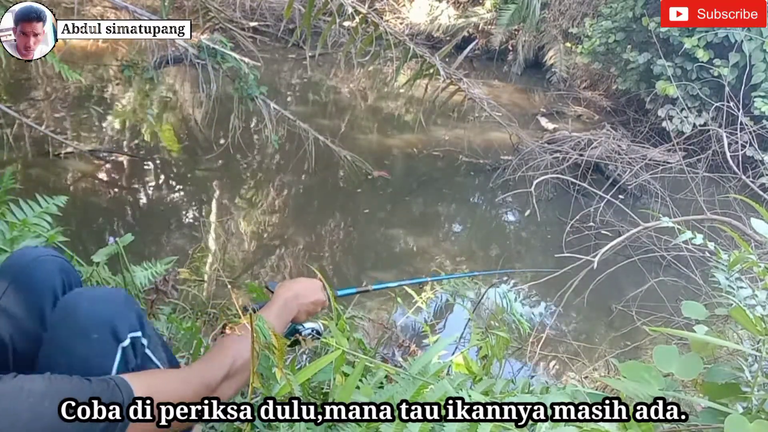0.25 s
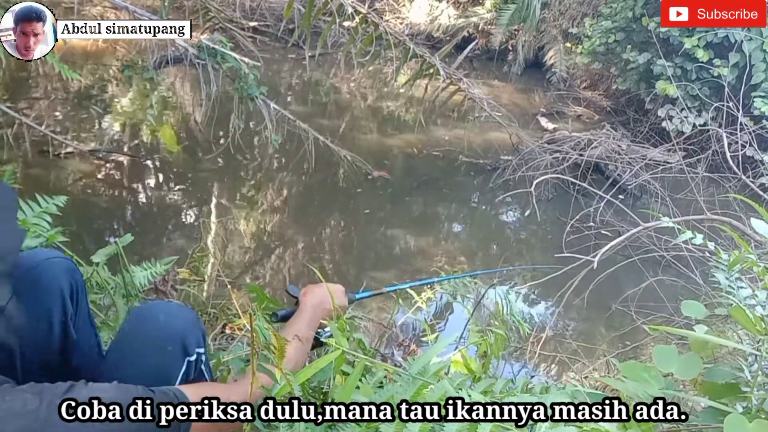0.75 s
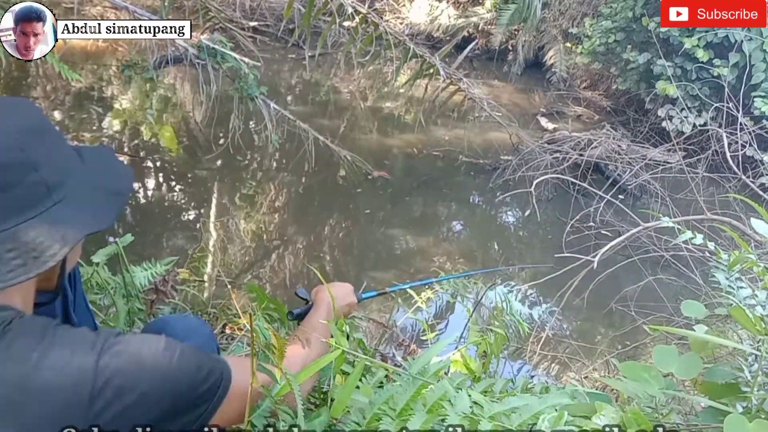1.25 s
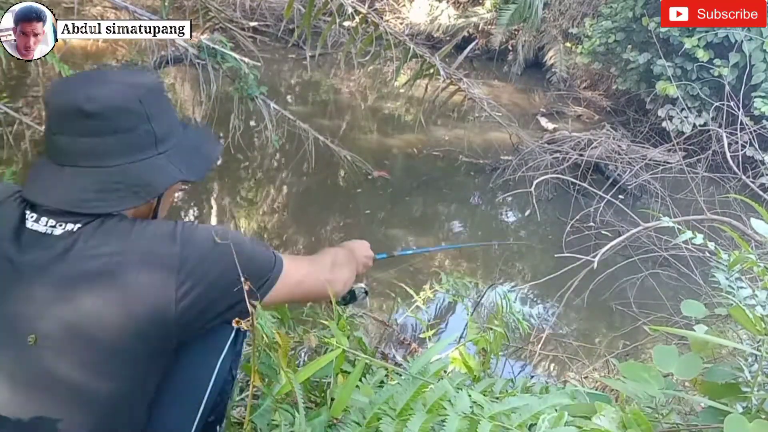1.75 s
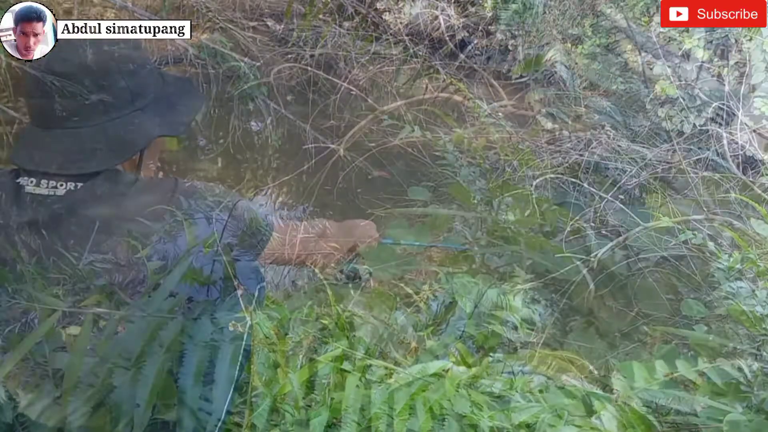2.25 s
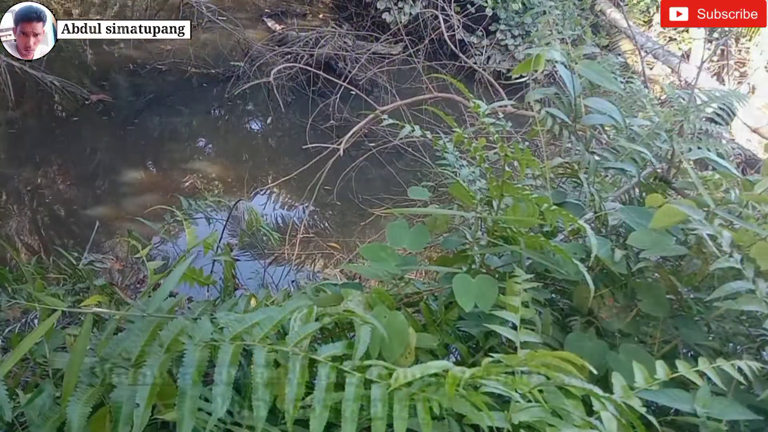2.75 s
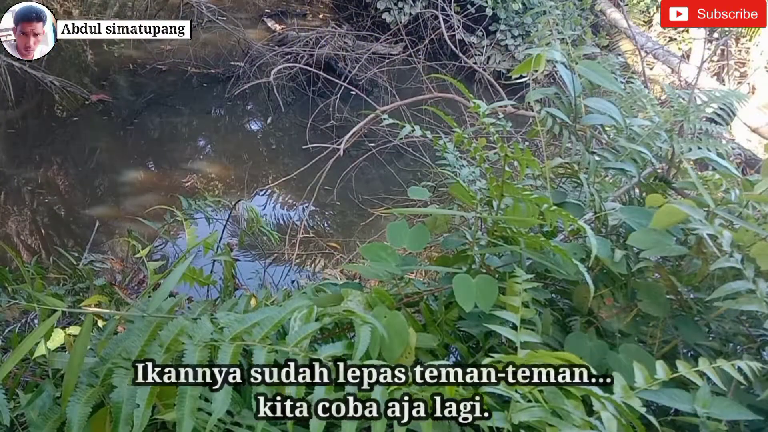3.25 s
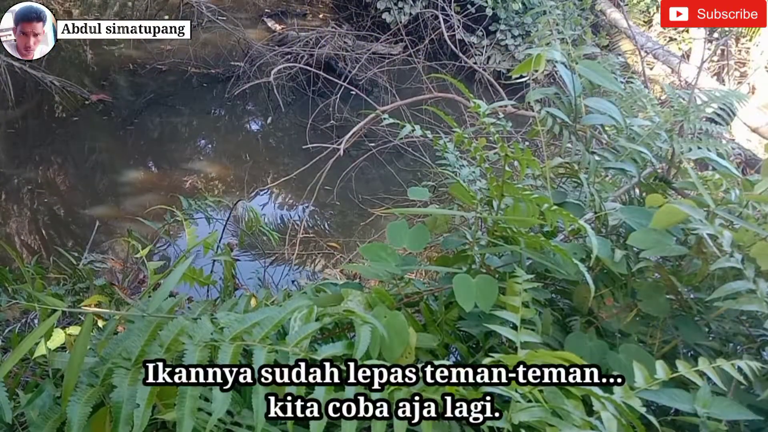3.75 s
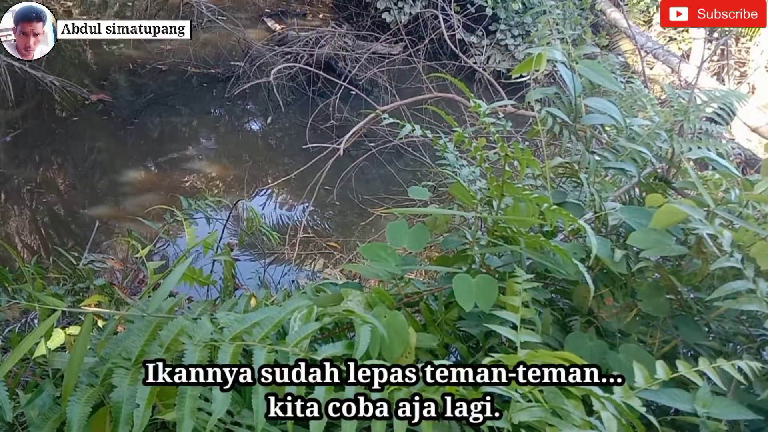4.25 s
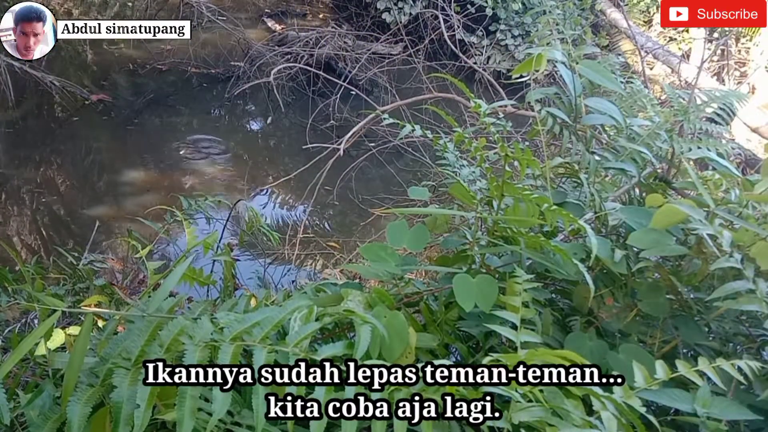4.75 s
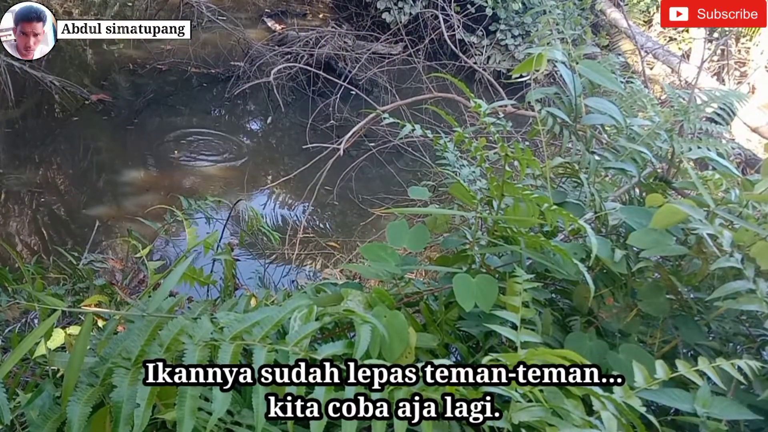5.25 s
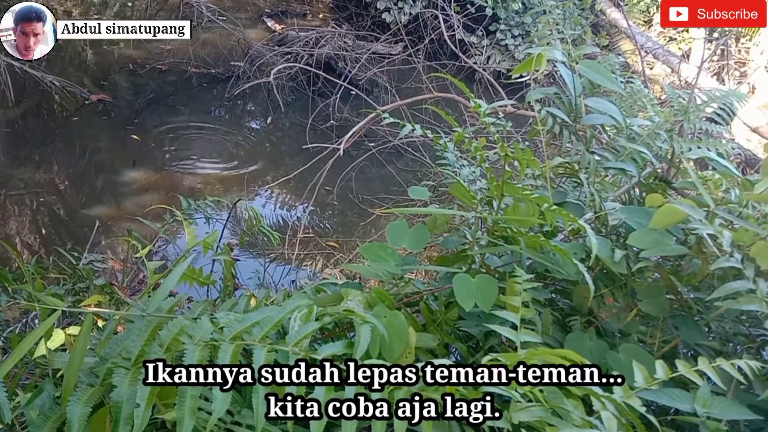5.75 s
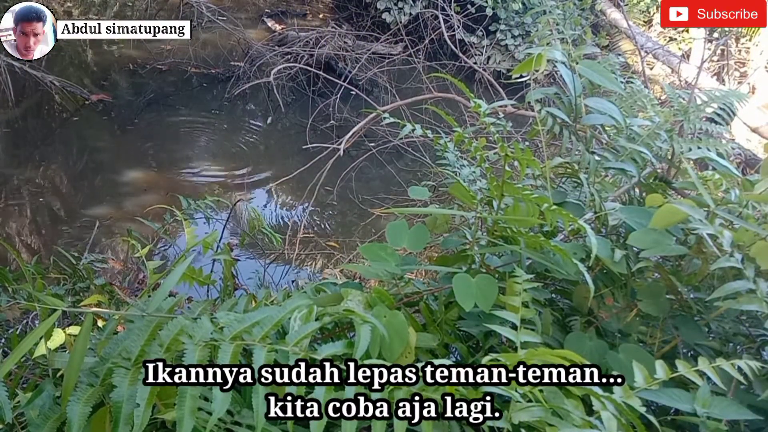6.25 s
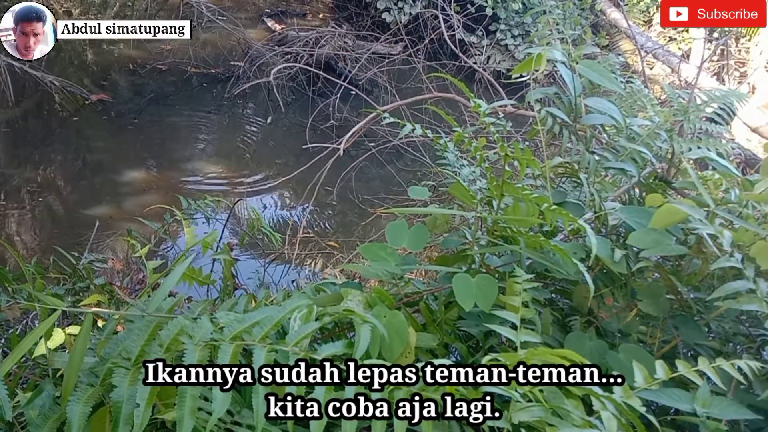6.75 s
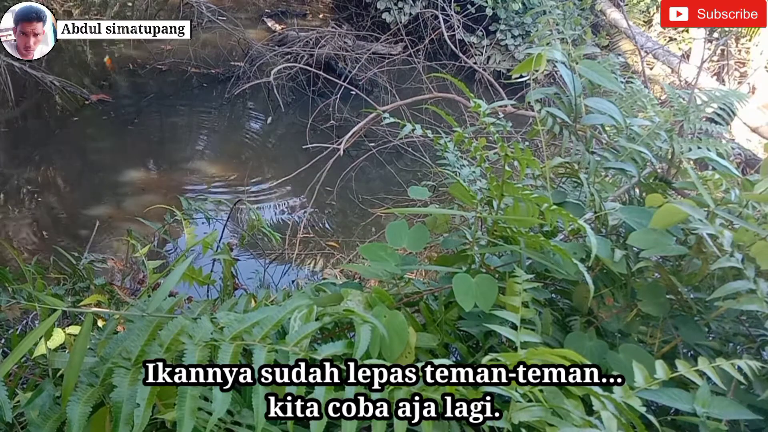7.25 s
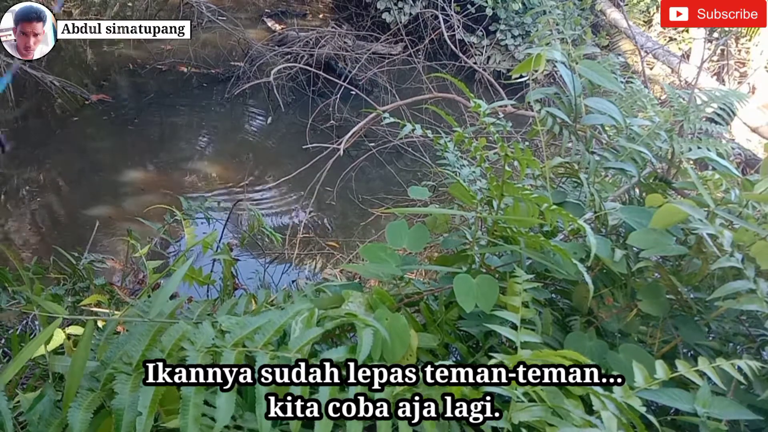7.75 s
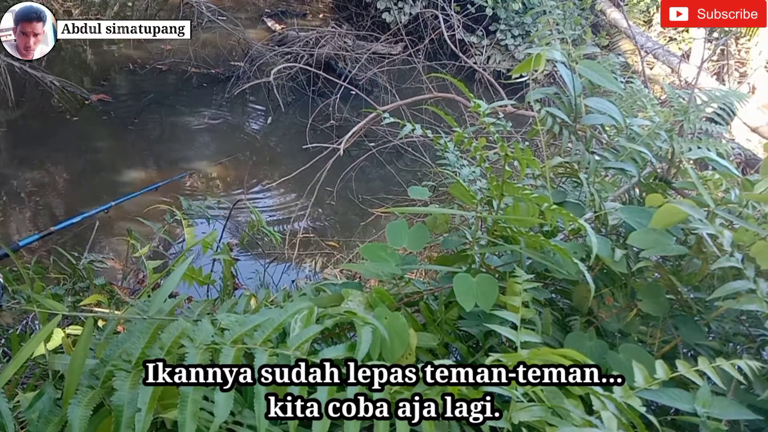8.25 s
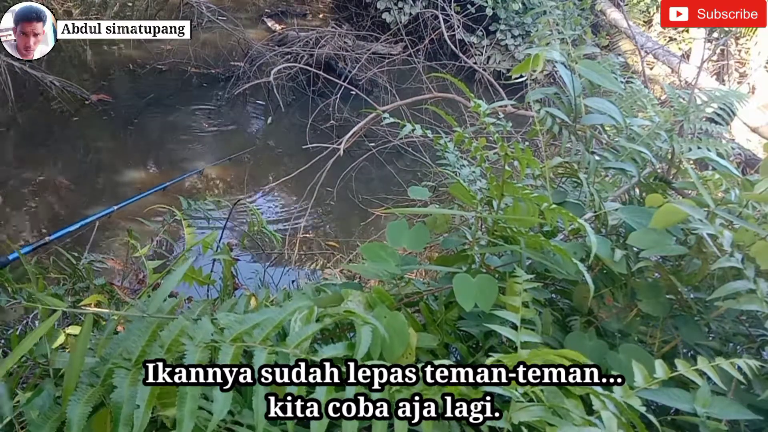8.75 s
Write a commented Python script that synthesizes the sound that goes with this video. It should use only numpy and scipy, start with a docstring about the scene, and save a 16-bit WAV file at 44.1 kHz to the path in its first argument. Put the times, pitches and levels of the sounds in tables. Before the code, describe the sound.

Heard from a leafy creek bank, a high, sizzling bed of crickets runs throughout, with faint bird chirps farther off. Small nearby clicks and rustles of stems and tackle come first, then a close cricket chirps and a small plop sounds in the water. A single loud wooden crack with a short echo dominates, followed by a quick cluster of clicks and a faint swelling whine.

```python
"""Crickets on a wooded creek bank

A bed of bush crickets drones near 8 kHz, wing on wing, with single insects throbbing, buzzing and
chirping in it. Far birds call over a wash of air and slow water. Up close, leaves rustle and stems and
fishing tackle click. A plop sets bubbles ringing, a soft bump follows, and at 6 s one loud wooden crack
rings out among the trees. A thin whine swells towards the end."""
import sys
import numpy as np
from scipy import signal
from scipy.fft import rfft, irfft
from scipy.io import wavfile

SR = 44100
rng = np.random.default_rng(int(sys.argv[2]) if len(sys.argv) > 2 else 0)


def inscribe(sig):
    """Save sig as 16-bit PCM at rate SR to the path in sys.argv[1].

    A 1-D sig is mono; a 2-D sig holds one channel per row.
    Samples are clipped to [-1, 1] before scaling.
    """
    pcm = np.round(np.clip(np.atleast_2d(sig).T, -1, 1) * 32767)
    wavfile.write(sys.argv[1], SR, pcm.astype(np.int16))


N = 396900
TIME = np.arange(N) / SR

# Table levels are relative: each layer's function sets its own trim.
# fader moves of the cricket bed: t/s, drone level/dB, sizzle level/dB
CHORUS_LEVELS = [(0.0, -54, -66), (0.68, -55, -66.5), (1.8, -54.5, -64.5), (2.46, -60, -69),
                 (2.98, -58.5, -64.5), (3.46, -55.5, -61), (4.21, -56.5, -60.5), (5.79, -55, -60.5),
                 (8.5, -55.5, -60), (9.0, -53.5, -62)]
# spectra of the wing drone and the sizzle above it: f/Hz, level/dB
DRONE_COLOUR = [(6700, -42.5), (7150, -33), (7480, -10.5), (7700, -11), (7980, -2), (8300, 1), (8520, -3),
                (8730, -15.5), (9100, -18.5), (9400, -24.5), (9850, -32.5), (11400, -34)]
SIZZLE_COLOUR = [(10200, -38.5), (10800, -24.5), (11450, -26), (12000, -13), (13100, -7.5), (13600, -6.5),
                 (14100, -3), (15400, 2), (16500, 0.5)]
# spectrum of air and slow water: f/Hz, level/dB
AIR_COLOUR = [(20, -15.5), (45, -4), (90, 3.5), (160, 0.5), (330, -4), (600, -6.5), (1080, -6),
              (1330, -1.5), (1800, -8.5), (3200, -16.5), (4700, -26.5), (5300, -43), (7000, -16),
              (12000, -25.5)]
# swell of that wash: t/s, level/dB
AIR_LEVELS = [(0.0, -78), (1.28, -78), (1.51, -72.5), (1.66, -75), (2.15, -80), (5.9, -77)]
# far twitter in the canopy: t/s, high voices' level/dB, low voices' level/dB
TWITTER_LEVELS = [(0.0, -92.5, -82), (1.75, -86.5, -89), (2.35, -91.5, -82), (3.72, -85.5, -83),
                  (5.0, -89.5, -81), (6.6, -90, -86.5), (8.35, -92, -86), (8.7, -87, -82.5)]
# far cricket trills: start/s, end/s, f/Hz, width/Hz, level/dB
TRILLS = [(0, 2.8, 5860, 70, -81), (0, 2.4, 6850, 240, -83), (0, 6.2, 6520, 150, -88),
          (6.3, 9, 9590, 120, -80)]
# low bird notes and, at 7.869 s, the brief low ring of the loud click: t/s, length/s, f/Hz, level/dB
LOW_NOTES = [(.01, 0.075, 700, -78.5), (1.243, 0.17, 354, -72), (1.493, .23, 348.6, -71),
             (1.942, 0.062, 350, -71), (2.522, 0.079, 705, -81), (2.63, 0.074, 705, -74.5),
             (7.355, .1, 697, -79.5), (7.869, 0.055, 726, -70), (8.075, 0.069, 699, -70),
             (8.164, 0.1, 699, -71)]
# upward slurs: t/s, length/s, starting f/Hz, level/dB
SLURS = [(.122, .12, 1700, -67.5), (.443, .115, 1700, -68.5), (1.745, 0.054, 2440, -63)]
# falling whistles: t/s, length/s, level/dB, roughness
WHISTLES = [(0.125, .1, -67, 1.08), (6.291, 0.096, -66.5, 0.95), (8.282, 0.32, -65.5, 0.13)]
# short, nearly level bird notes: t/s, length/s, f/Hz, level/dB
SHORT_NOTES = [(3.46, .06, 5500, -82), (3.564, .045, 4190, -73), (3.661, 0.2, 1298, -78),
               (3.72, .065, 4430, -72), (3.795, .07, 4000, -77), (3.869, .065, 4150, -70.5),
               (4.007, .06, 4000, -69.5), (5.179, 0.052, 1460, -70), (5.305, 0.073, 1470, -72),
               (5.415, .055, 1507, -73.5), (6.414, 0.083, 1366, -61)]
# leaf rustles: t/s, length/s, level/dB, centre f/Hz
RUSTLES = [(.262, 0.035, -67, 1140), (.263, 0.033, -65.5, 340), (1.369, 0.25, -59.5, 3700),
           (1.404, 0.12, -68.5, 1220), (1.752, .052, -61, 12900), (2.42, 0.052, -71, 4000),
           (2.539, 0.065, -58, 4600), (2.552, .06, -69.5, 1410), (2.858, .21, -73.5, 3200),
           (7.841, .15, -72, 3750), (7.864, 0.069, -64.5, 1400)]
# clicks of stems and tackle: t/s, level/dB, body f/Hz, snap against body/dB
CLICKS = [(.27, -55, 1190, 12.5), (.829, -60.5, 1600, 21), (.883, -40, 5650, -21), (.881, -56, 1370, -6),
          (.941, -46.5, 4640, -10), (1.42, -43.5, 1380, 5.5), (1.4689, -43, 1220, 15.5),
          (1.54, -42, 4100, 11), (2.428, -65.5, 2760, 18.5), (2.561, -49, 4300, 0), (3.356, -53, 2340, 7.5),
          (4.08, -52.5, 5770, 9.5), (4.583, -60.5, 2540, 9), (5.695, -41.5, 6500, -15),
          (7.8512, -30.5, 3780, 7), (7.877, -40, 1640, -17), (7.8857, -29, 4600, -4),
          (8.739, -46.5, 1500, -10)]
# spectrum of a click's snap: f/Hz, level/dB
SNAP_COLOUR = [(200, -4), (900, 1), (3000, 1.5), (5000, -1.5), (8000, 3), (10500, -4.5), (15000, -11)]
# bouts of the nearest cricket: t/s, number of chirps, level/dB
CHIRP_BOUTS = [(3.203, 4, -45), (3.704, 3, -43)]
# bubbles of the plop: t/s, starting f/Hz, level/dB
BUBBLES = [(4.196, 2200, -39.5), (4.215, 924, -42), (4.216, 1415, -46), (4.214, 2250, -43),
           (4.238, 4380, -40)]
# the whine, one curve per phrase: t/s, f/Hz, level/dB
WHINE_PHRASES = [
    [(5.15, 2850, -93), (5.3, 2847, -72), (5.798, 2853, -92), (5.92, 2847, -72.5), (6.0, 2890, -75)],
    [(7.3, 2964, -87), (7.574, 2965, -73.5), (7.868, 2946, -69.5), (7.914, 2946, -83.5), (8.118, 2937, -66),
     (8.18, 2910, -91), (8.208, 2910, -68), (8.266, 2916, -97), (8.402, 2892, -66), (8.454, 2860, -96.5),
     (8.52, 2945, -64.5), (9.0, 2890, -59)],
]
# the crack's two breaks in quick succession: t/s, level/dB
CRACK_BREAKS = [(6.0092, -9), (6.0109, -8.5)]
# spectra of the crack and of its scatter from the trees: f/Hz, level/dB
CRACK_COLOUR = [(25, -31.5), (130, -1), (290, -13.5), (450, 1), (750, -3.5), (1050, 0.5), (1350, 3),
                (1700, -11), (2700, -12), (4300, -27.5), (5500, -51), (12000, -58.5)]
SCATTER_COLOUR = [(25, -34), (100, -5), (260, -11), (450, -2.5), (750, -5.5), (1150, 3.5), (1400, -5.5),
                  (1800, -8), (3000, -2.5), (4300, -10.5), (5600, -26.5), (8000, -16.5), (10500, -40.5),
                  (15000, -35)]
# reverb time among the trees: f/Hz, t60/s
WOOD_T60 = [(60, 0.89), (500, 0.23), (1200, 0.69), (3000, 0.45), (6000, 0.88), (15000, .4)]


def from_db(db):
    """Decibels to gain."""
    return 10 ** (np.asarray(db) / 20)


def rms_one(x):
    """Scale to rms 1."""
    return x / np.sqrt(np.mean(x ** 2) + 1e-20)


def in_time(rows):
    """Each column of a curve at every sample."""
    s, *columns = np.transpose(rows)
    return [np.interp(TIME, s, c) for c in columns]


def at_hz(points, hz):
    """Read a curve on a log-frequency axis."""
    f, value = np.transpose(points)
    return np.interp(np.log(hz + 1e-9), np.log(f), value)


def add(out, s, sound):
    """Mix a sound in at time s."""
    i = max(round(s * SR), 0)
    out[i:i + len(sound)] += sound[:max(N - i, 0)]


def sine(hz):
    """An oscillator that follows a pitch curve."""
    return np.sin(2 * np.pi * np.cumsum(hz) / SR)


def noise(colour):
    """Noise with the given spectrum, rms 1."""
    gain = from_db(at_hz(colour, np.fft.rfftfreq(N, 1 / SR)))
    return rms_one(irfft(rfft(rng.standard_normal(N)) * gain, N))


def narrow(hz, width_hz):
    """Noise in one steep resonance, rms 1."""
    detune = (np.fft.rfftfreq(N, 1 / SR) - hz) / (width_hz / 2)
    return rms_one(irfft(rfft(rng.standard_normal(N)) / (1 + detune ** 2), N))


def drift(width_hz):
    """Random modulation, rms 1; wider moves faster."""
    return narrow(0, width_hz)


def gate(length, edge):
    """A note's envelope; edge is the share spent rising and falling."""
    return signal.windows.tukey(max(int(length * SR), 8), edge)


def pulse(colour, size=4096):
    """The tightest causal transient with the given spectrum, peak 1."""
    cepstrum = irfft(np.log(from_db(at_hz(colour, np.fft.rfftfreq(size, 1 / SR)))))
    shape = irfft(np.exp(rfft(2 * cepstrum[:size // 2], size)))
    return shape / np.abs(shape).max()


def among_trees(x, t60):
    """Diffuse reverb from trunks and leaves, at unity energy gain."""
    tail = rng.standard_normal(SR) * from_db(-60 * TIME[:SR] / t60)
    return signal.fftconvolve(x, tail / np.linalg.norm(tail))[:N]


def chorus(stroke_hz=19):
    """Many wings blur into a drone and a sizzle; the nearer ones leave a trace of their stroke rate."""
    drone_db, sizzle_db = in_time(CHORUS_LEVELS)
    strokes = sine(stroke_hz * (1 + .14 * drift(5.2)))
    drone = noise(DRONE_COLOUR) * from_db(drone_db + 1.5 + .5 * drift(130) - .1 * strokes)
    sizzle = noise(SIZZLE_COLOUR) * from_db(sizzle_db + 7 + 1.5 * drift(90))
    return drone + sizzle


def air():
    """The soft wash of air, leaves and slow water."""
    db, = in_time(AIR_LEVELS)
    return noise(AIR_COLOUR) * from_db(db - .1 * drift(60))


def twitter():
    """Many far birds blur into two flickering registers."""
    high_db, low_db = in_time(TWITTER_LEVELS)
    high = narrow(hz=4600, width_hz=700) * from_db(high_db + 4 * drift(30))
    low = narrow(hz=2900, width_hz=2000) * from_db(low_db + 2.5 * drift(30))
    return high + low


def trilling_crickets():
    """Far crickets hold faint trills, each in its own narrow band."""
    out = np.zeros(N)
    for start, end, hz, width_hz, db in TRILLS:
        shape = gate(end - start, edge=.13)[:N]
        add(out, start, from_db(db) * shape * narrow(hz, width_hz)[:len(shape)])
    return out


def note_cues(slur_octaves_per_s=4.4, whistle_hz=(1100, 988), faint_count=7, faint_s=.16):
    """The cue list of notes: t/s, length/s, starting f/Hz, ending f/Hz, level/dB, roughness."""
    low = [(s, length, hz, hz, db, .59) for s, length, hz, db in LOW_NOTES]
    slurs = [(s, length, hz, hz * 2 ** (slur_octaves_per_s * length), db, .8)
             for s, length, hz, db in SLURS]
    whistles = [(s, length, *whistle_hz, db, rough) for s, length, db, rough in WHISTLES]
    short = [(s, length, hz, hz * .985, db, .34) for s, length, hz, db in SHORT_NOTES]
    # faint high notes from the canopy, one at random in each time slot
    slot_s = (N / SR - 2 * faint_s) / faint_count
    times = (np.arange(faint_count) + rng.random(faint_count)) * slot_s
    pitches = rng.normal(4700, 120, faint_count)
    faint = [(s, faint_s, hz, hz, -85, .3) for s, hz in zip(times, pitches)]
    return low + slurs + whistles + short + faint


def calls_and_ring(trim_db=-2.5, flutter_db=3):
    """Bird calls and the loud click's brief low ring: pure tones roughened by a fast pitch tremble."""
    out, tremble = np.zeros(N), drift(540)
    for s, length, start_hz, end_hz, db, rough in note_cues():
        shape = gate(length, edge=.65)
        glide = np.linspace(start_hz, end_hz, len(shape))
        rasp = .06 * rough * tremble[int(s * SR):][:len(shape)]
        add(out, s, from_db(db) * np.sqrt(2) * shape * sine(glide * (1 + rasp)))
    out *= from_db(trim_db + flutter_db * drift(60))
    return out + from_db(-1) * among_trees(out, t60=.22)


def throbbing_cricket(hz=7920, every_s=.06045, chirp_s=.069, fade_from_s=1.91, fade_db_per_s=11.5):
    """One wing resonance throbs on an even beat, blurred by the undergrowth, then fades away."""
    swell, beats = np.zeros(N), np.arange(.048, 2.8, every_s)
    for s, (late, weak) in zip(beats, rng.standard_normal((len(beats), 2))):
        db = -44.5 - .1 * weak - fade_db_per_s * max(s - fade_from_s, 0)
        add(swell, s + .004 * late - chirp_s / 2, from_db(db) * gate(chirp_s, edge=.73))
    tone = from_db(-5.5) * sine(hz + 35 * drift(139.6))
    blur = from_db(-9) * narrow(hz, width_hz=210)
    song = swell * (tone + blur)
    return song + from_db(-5) * among_trees(song, t60=.35)


def woody(force, ring_s, count=24):
    """A twig's own random resonances colour a force, at unity energy gain."""
    t = TIME[:SR // 40]
    mode_hz = rng.uniform(600, 9000, (count, 1))
    ring = np.sin(2 * np.pi * mode_hz * t).sum(axis=0) * np.exp(-t / ring_s)
    return np.convolve(force, ring / np.linalg.norm(ring))[:len(force)]


def rustles(ticks_per_s=700, spread_db=7, band_ratio=1.92):
    """Leaf edges catch and slip in short showers of tiny ticks."""
    out = np.zeros(N)
    ticks = (rng.random(N) < ticks_per_s / SR) * rng.choice([-1, 1], N)
    ticks = ticks * from_db(spread_db * rng.standard_normal(N))
    for s, length, db, hz in RUSTLES:
        edges_hz = [hz / band_ratio, min(hz * band_ratio, .45 * SR)]
        band = signal.butter(2, edges_hz, "band", fs=SR, output="sos")
        shape = gate(length, edge=1) ** .5
        force = ticks[int(s * SR):][:len(shape)]
        crackle = signal.sosfilt(band, .21 * force + woody(force, ring_s=.0029))
        add(out, s, from_db(db) * shape * rms_one(crackle))
    return out + from_db(-7) * among_trees(out, t60=.35)


def settling_clicks(count=2, gap_s=.012, loss_db=10.5, detune=.13):
    """Every click, plus the weaker ticks that follow at uneven gaps as the stem settles."""
    rows = list(CLICKS)
    for s, db, hz, snap_db in CLICKS:
        for late, sharp in rng.random((count, 2)):
            s += gap_s * (.5 + late)
            db -= loss_db
            rows.append((s, db, hz * (1 + detune * (2 * sharp - 1)), snap_db))
    return rows


def clicks(trim_db=1.5):
    """A bright, splintery snap and the brief ring of a stem or rod, thin below its own pitch."""
    out, t, snap = np.zeros(N), TIME[:SR // 20], pulse(SNAP_COLOUR)
    for s, db, hz, snap_db in settling_clicks():
        force = .07 * rng.standard_normal(len(t)) * np.exp(-t / .005)  # splinters
        force[0] = 1  # the main hit
        bright = np.convolve(force + from_db(-3) * woody(force, ring_s=.0046), snap)[:len(t)]
        body = np.sin(2 * np.pi * hz * t) * np.exp(-t * hz / 2.2)
        low_cut = signal.butter(6, .75 * hz, "high", fs=SR, output="sos")
        add(out, s, from_db(db + trim_db) * signal.sosfilt(low_cut, from_db(snap_db) * bright + body))
    return out + from_db(-6) * among_trees(out, t60=.25)


def buzzing_cricket(first_s=3.031, every_s=.8555, buzz_s=.455, count=7):
    """A far, lower cricket buzzes at a steady pace; its first buzz is softer."""
    bouts = np.zeros(N)
    for k in range(count):
        db = -74 if k == 0 else -71.5
        add(bouts, first_s + k * every_s, from_db(db) * gate(buzz_s, edge=.24))
    return bouts * narrow(hz=6370, width_hz=130)


def near_cricket(every_s=.0553, first_length_s=.02, growth_s=.002, first_hz=8225, step_hz=28.7):
    """Each wing stroke is a pure, sagging tone, a little longer and higher than the last in its bout."""
    out = np.zeros(N)
    for s, count, db in CHIRP_BOUTS:
        for k in range(round(count)):
            shape = gate(first_length_s + k * growth_s, edge=.46)
            pitch = first_hz + k * step_hz + np.linspace(35, -35, len(shape))
            add(out, s + k * every_s, from_db(db) * np.sqrt(2) * shape * sine(pitch))
    return out + from_db(-17) * among_trees(out, t60=.35)


def plop(attack_s=.0022, ring_cycles=9, rise_per_s=.83, spray_rise_s=.015, spray_fall_s=.046):
    """Something breaks the surface: bubbles ring and rise slightly in pitch, fine spray falls back."""
    out, t = np.zeros(N), TIME[:SR // 4]
    for s, hz, db in BUBBLES:
        shape = (1 - np.exp(-t / attack_s)) * np.exp(-t * hz / ring_cycles)
        add(out, s, from_db(db) * shape * sine(hz * (1 + rise_per_s * t)))
    shower = (1 - np.exp(-t / spray_rise_s)) * np.exp(-t / spray_fall_s)
    spray = shower / shower.max() * narrow(hz=3400, width_hz=3600)[:len(t)]
    add(out, BUBBLES[1][0], from_db(-62.5) * spray)
    return out + from_db(-8.5) * among_trees(out, t60=.12)


def thump(start_s=4.763, length_s=.06, hz=56, db=-66):
    """A soft low bump."""
    out, shape = np.zeros(N), gate(length_s, edge=.66)
    add(out, start_s, from_db(db) * np.sqrt(2) * shape * np.sin(2 * np.pi * hz * TIME[:len(shape)]))
    return out


def chattering_bird(first_s=5.072, gap_s=.105, slowing_s=.004, first_hz=3310, drop_hz=40, count=5):
    """A raspy phrase from deep in the trees, slower and lower with each syllable."""
    out, tremble, shape = np.zeros(N), drift(540), gate(.06, edge=.29)
    sag = .038 * np.linspace(.5, -.5, len(shape))
    for k in range(count):
        s = first_s + k * gap_s + k * k * slowing_s
        rasp = .038 * tremble[int(s * SR):][:len(shape)]
        pitch = (first_hz - k * drop_hz) * (1 + sag + rasp)
        add(out, s, from_db(-68) * shape * sine(pitch))
    return out + from_db(1) * among_trees(out, t60=.28)


def whine(waver_hz=6, trim_db=-1.5, flutter_db=3.5):
    """A thin wavering tone; its echoes beat against it."""
    out = np.zeros(N)
    for phrase in WHINE_PHRASES:
        hz, db = in_time(phrase)
        sounding = (TIME >= phrase[0][0]) & (TIME <= phrase[-1][0])
        level = from_db(db + trim_db + flutter_db * drift(20))
        out += sounding * level * np.sqrt(2) * sine(hz + waver_hz * drift(17))
    return out + from_db(-5.5) * among_trees(out, t60=.86)


def octave_decay(x, t60s):
    """Each octave of x dies away at its own rate."""
    hz, t = np.fft.rfftfreq(len(x), 1 / SR), TIME[:len(x)]
    spectrum, out = rfft(x), np.zeros(len(x))
    for centre in 20 * 2. ** np.arange(11):
        share = np.maximum(1 - np.abs(np.log2((hz + 1e-9) / centre)), 0)
        out += irfft(spectrum * share, len(x)) * from_db(-60 * t / at_hz(t60s, centre))
    return out


def crack(bank_delay_s=.078, build_s=.0045, reach_s=.32):
    """A heavy wooden crack, a smeared slapback from the far bank and the dense scatter of the wood."""
    out, hit, t = np.zeros(N), pulse(CRACK_COLOUR), TIME[:SR]
    start_s = CRACK_BREAKS[0][0]
    for k, (s, db) in enumerate(CRACK_BREAKS):
        add(out, s, (-1) ** k * from_db(db) * hit)  # opposite polarities
    smear = gate(.04, edge=.61)
    add(out, start_s + bank_delay_s, from_db(-38.5) * smear * noise(CRACK_COLOUR)[:len(smear)])
    scatter = (noise(SCATTER_COLOUR) * from_db(.5 * drift(200)))[:SR]
    # the echoes thicken quickly and run out beyond the farthest trunks
    paths = (1 - np.exp(-t / build_s)) * np.exp(-(t / reach_s) ** 4)
    add(out, start_s, from_db(-27.5) * octave_decay(scatter, WOOD_T60) * paths)
    return out


def scene():
    """The mono mix, as heard from the bank."""
    insects = chorus() + throbbing_cricket() + near_cricket() + trilling_crickets() + buzzing_cricket()
    bank = clicks() + rustles() + crack() + plop() + thump() + air()
    return (insects + bank + calls_and_ring() + chattering_bird() + twitter() + whine())[None, :]


def record(dry):
    """A steep high cut on the whole mix."""
    cutoff_hz = 15430
    return signal.sosfilt(signal.ellip(12, .1, 80, cutoff_hz, fs=SR, output="sos"), dry)


dry = scene()
out = record(dry)
inscribe(out)
```